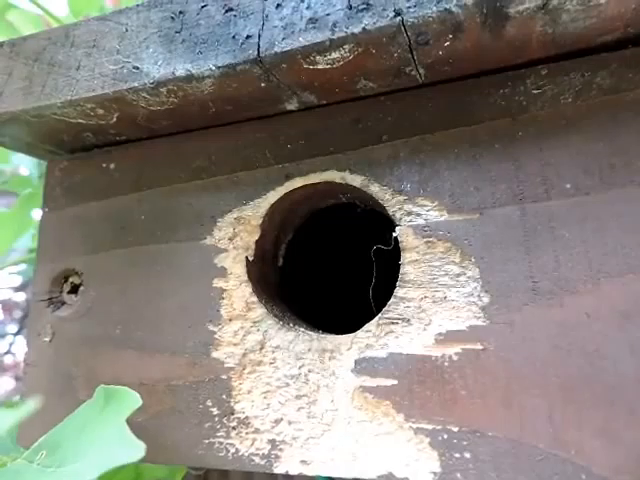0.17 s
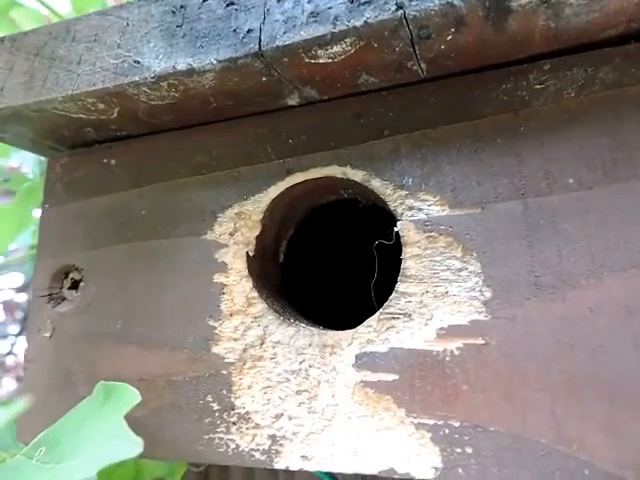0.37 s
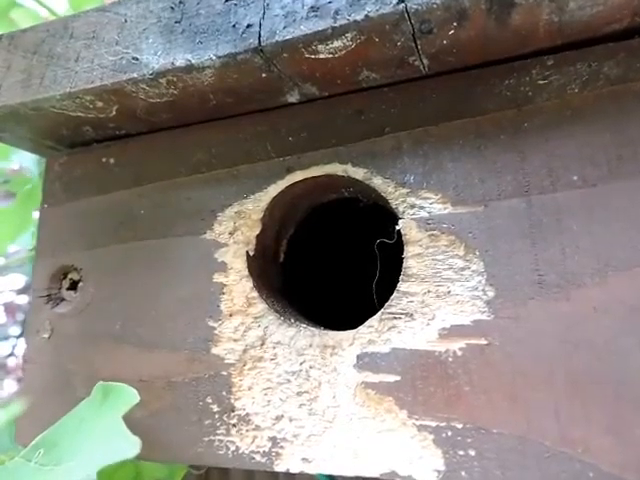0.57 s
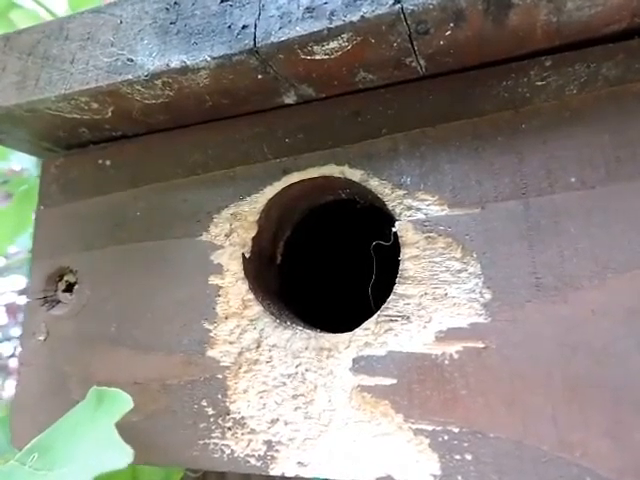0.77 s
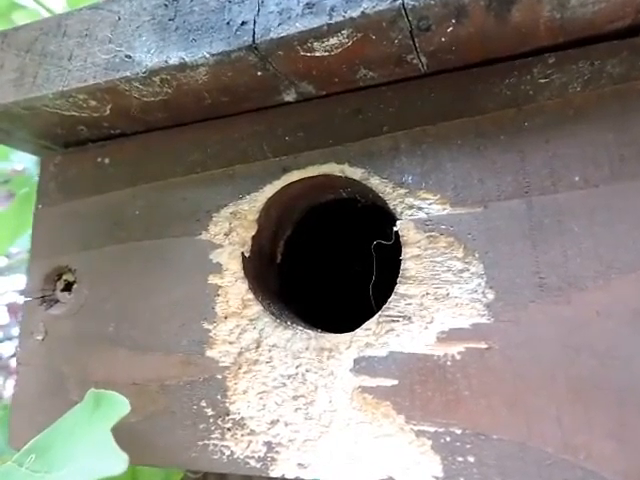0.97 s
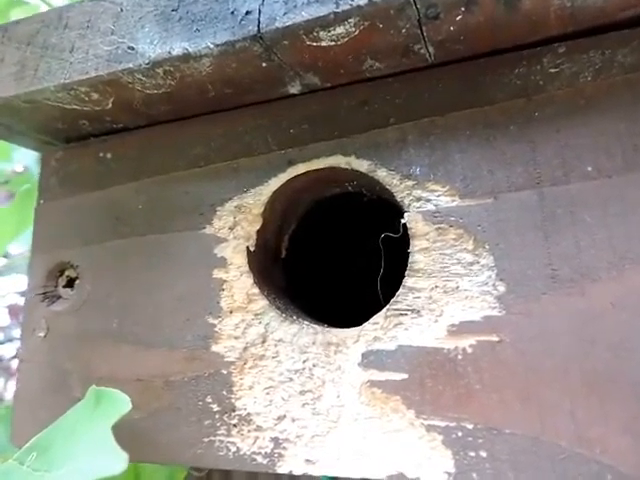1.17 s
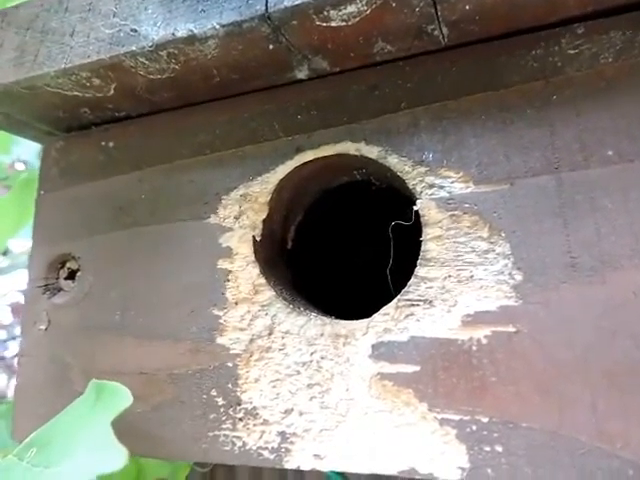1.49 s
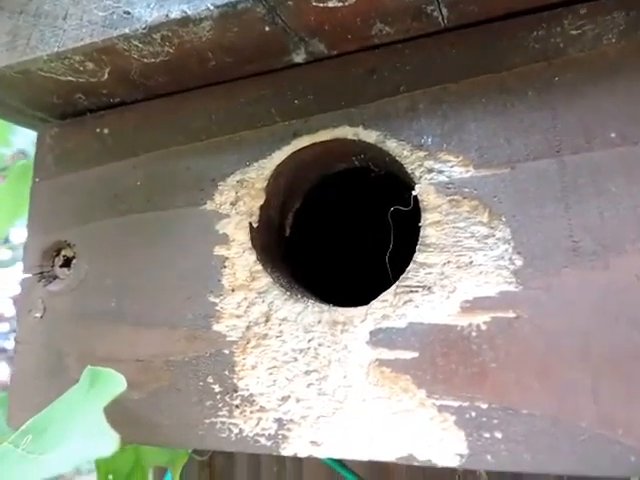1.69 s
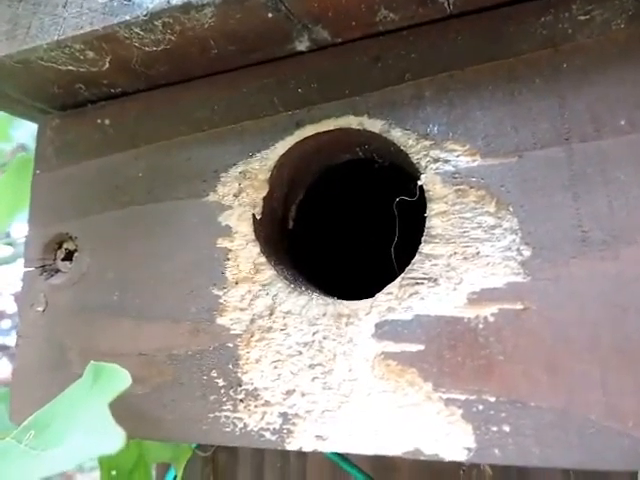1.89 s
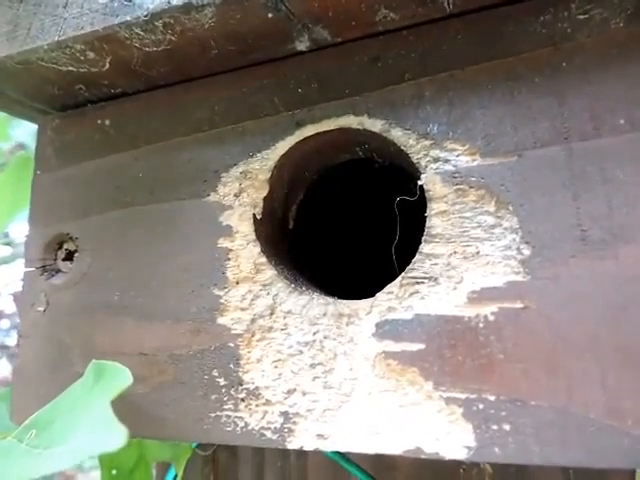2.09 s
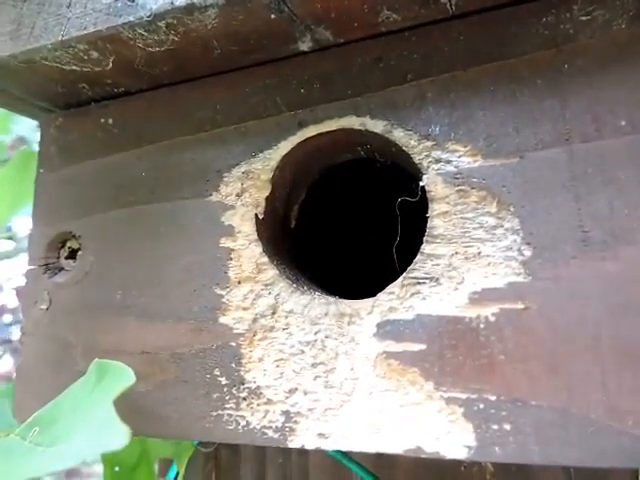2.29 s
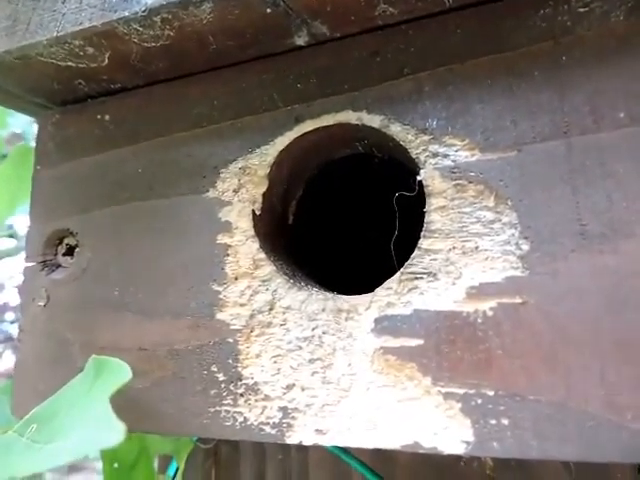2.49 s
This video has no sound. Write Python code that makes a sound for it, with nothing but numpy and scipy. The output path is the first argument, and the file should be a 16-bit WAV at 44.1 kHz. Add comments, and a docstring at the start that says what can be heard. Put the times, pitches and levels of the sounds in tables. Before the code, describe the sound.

Nestlings beg in two quick runs of high, slightly raspy chirps, each starting thin and getting louder, with two soft peeps between them. The microphone is close to their wooden birdhouse, with faint outdoor air behind.

```python
"""Baby birds beg in a wooden nest box: thin rising notes grow into loud chirps, twice, with two soft
peeps in between. Each call is two whistles, one from each side of the bird's voice organ (the syrinx),
which beat against each other and mix into extra tones, with a husky rasp. We listen just outside the
entrance hole, so the box colours the calls and rings briefly, over a faint outdoor rumble."""
import sys
import numpy as np
from scipy import signal
from scipy.fft import rfft, irfft
from scipy.io import wavfile
from scipy.ndimage import uniform_filter1d

SR = 44100
rng = np.random.default_rng(int(sys.argv[2]) if len(sys.argv) > 2 else 0)


def waveform_to_disk(signal):
    """Save audio, clipped to [-1, 1], as 16-bit WAV at the path in sys.argv[1]."""
    frames = np.transpose(np.atleast_2d(signal))
    scaled = np.clip(frames, -1, 1) * 32767
    samples = np.round(scaled).astype(np.int16)
    wavfile.write(sys.argv[1], SR, samples)


N = 116865


def amp(db):
    """Turns decibels into a gain."""
    return 10 ** (np.asarray(db) / 20)


def unit(x):
    """Scales a signal to an average power of 1."""
    return x / np.sqrt(np.mean(abs(x) ** 2) + 1e-20)


def read(points, hz):
    """Looks up a table between its frequencies, on a log scale."""
    f, value = np.transpose(points)
    return np.interp(np.log(hz + 1), np.log(f), value)


def add(mix, start, sound, pan_db):
    """Places a sound in time and between the ears (positive pan is left)."""
    part = mix[:, max(round(start * SR), 0):][:, :len(sound)]
    part += amp([[pan_db / 2], [-pan_db / 2]]) * sound[:part.shape[1]]


def noise(spectrum, n):
    """Noise with the given tone colour."""
    gain = amp(read(spectrum, np.fft.rfftfreq(n, 1 / SR)))
    return unit(irfft(rfft(rng.standard_normal(n)) * gain, n))


def wander(n, rate_hz=614):
    """A smooth random wobble, up to about the given rate."""
    gain = np.exp(-(np.fft.rfftfreq(n, 1 / SR) / rate_hz) ** 2)
    return unit(irfft(rfft(rng.standard_normal(n)) * gain, n))


# tone colour of the outdoor air: (frequency [Hz], relative level [dB])
AIR_COLOUR = [(12, -25), (20, 2), (219, -9.5), (1500, -21.5), (3260, -30.5), (6540, -36.5), (15500, -43.5)]
# its loudness over time: (time [s], level [dB])
AIR_LEVEL = [(.3, -50.5), (.8, -52.5), (1.6, -50.5), (2.6, -50)]
# how alike it is in both ears: (frequency [Hz], likeness [0-1])
AIR_LIKENESS = [(30, 0.26), (170, 1), (1500, 0.095)]


def air():
    """Distant rumble and hiss, partly shared by the two ears."""
    middle, side = rfft(noise(AIR_COLOUR, N)), rfft(noise(AIR_COLOUR, N))
    alike = read(AIR_LIKENESS, np.fft.rfftfreq(N, 1 / SR))
    side *= np.sqrt((1 - alike) / (1 + alike))
    level = amp(np.interp(np.arange(N) / SR, *np.transpose(AIR_LEVEL)))
    return level * irfft([middle + side, middle - side], N)


# low background tones: (pitch [Hz], level [dB])
HUM_TONES = [(208, -62), (370, -68)]


def hum(waver_hz=7):
    """A faint hum that wavers in loudness and pitch."""
    t = np.arange(N) / SR
    tones = 0
    for hz, db in HUM_TONES:
        waver = 1 + .4 * wander(N, waver_hz)
        tones += amp(db) * unit(waver * np.sin(2 * np.pi * hz * t + wander(N, waver_hz)))
    return tones


# puffs of wind: (time [s], width [s], level [dB])
PUFFS = [(1.6, 0.078, -42), (1.93, 0.061, -44.5)]


def wind(rumble_hz=55, pan_db=5):
    """Light wind rumbles on the microphone, more on the left."""
    t = np.arange(N) / SR
    gusts = sum(amp(db) * np.exp(-((t - time) / width) ** 2) for time, width, db in PUFFS)
    shared, left, right = (wander(N, rumble_hz) for _ in range(3))
    return gusts * unit(shared + .5 * np.array([left, right])) * amp([[pan_db / 2], [-pan_db / 2]])


def echoes(fade_s):
    """Spectrum of dense echoes, different at each ear, that fall 60 dB in fade_s."""
    t = np.arange(SR // 5) / SR
    tail = rng.standard_normal((2, len(t))) * 1000 ** (-t / fade_s) * (t > .001)
    return rfft(tail / np.linalg.norm(tail, axis=1, keepdims=True), N)


# pitches the hollow box boosts or weakens: (frequency [Hz], gain [dB])
RESONANCES = [(3200, 3.5), (4480, -0.5), (5030, 3), (6800, 5.5), (7400, 3), (8150, -2), (10650, 2.5)]
# quick scatter off the walls: (frequency [Hz], level [dB])
WALL_SCATTER = [(7000, -16.5), (10000, -1.5)]
# balance of the sound from the hole: (frequency [Hz], left minus right [dB])
BALANCE = [(1800, -0.5), (5000, -2.5), (15000, 0.5)]


def nest_box(calls, width_hz=170, ring_db=-11, gain_db=-1.32, left_lead_rad=-.77):
    """The hollow colours the calls and rings; the direct sound reaches the ears out of step."""
    hz = np.fft.rfftfreq(N, 1 / SR)
    hollow = np.prod([1 + (amp(db) - 1) / (1 + 2j * (hz - f) / width_hz) for f, db in RESONANCES], axis=0)
    ring = amp(ring_db) * echoes(.11) + amp(read(WALL_SCATTER, hz)) * echoes(.023)
    ear = np.array([[.5], [-.5]])  # left, right
    direct = np.exp(1j * left_lead_rad * ear)
    return irfft(rfft(calls) * hollow * (direct + ring) * amp(gain_db + ear * read(BALANCE, hz)), N)


# faint low tones under some chirps: (start [s], first pitch [Hz], level [dB])
UNDERTONES = [(.44, 1153, -54), (.562, 519, -51), (.68, 419, -55), (1.89, 1198, -51.5),
              (2.003, 1200, -52.5)]


def undertone(start, first_hz, db, length_s=.055, fall_to=.62, blur=.158):
    """A blurred low tone that slides down."""
    n = round(length_s * SR)
    hz = first_hz * (np.linspace(1, fall_to, n) + blur * wander(n))
    return start, amp(db) * np.sqrt(2 * np.hanning(n)) * np.sin(2 * np.pi * np.cumsum(hz) / SR), 0


CALL_PAN_DB = -2.5
# tiny pips that lead into a call: (time [s], level [dB])
PIPS = [(0.308, -52), (1.853, -49.5)]


def pip(time, db, hz=3314, width_s=.0034):
    """A few milliseconds of whistle."""
    t = np.arange(-.01, .01, 1 / SR)
    level = amp(db) * np.sqrt(2) * np.exp(-(t / width_s) ** 2)
    return time + t[0], level * np.sin(2 * np.pi * hz * t), CALL_PAN_DB


# the tones in a call, each a sum of: (upper pitch [multiple], lower pitch [multiple])
TONES = [(1, 0), (0, 1), (2, 0), (1, 1), (0, 2), (2, 1), (1, 2), (0, 3), (3, 1), (3, 0), (4, 0)]
# colour of the usual rasp: (frequency [Hz], relative level [dB])
RASP = [(400, -3), (2000, -8), (3300, 1.5), (4600, -0.5), (6900, -7.5), (8400, -4.5), (12600, -10.5),
        (15000, -12.5)]


def syrinx(upper_hz, lower_hz, rough, levels, rasp_db, rasp_colour=RASP, jitter_hz=171.3, anchor_hz=3980):
    """Two shaky whistles mix into extra tones, and a rasp pulses with their beat."""
    n = len(upper_hz)
    upper, lower = (2 * np.pi * np.cumsum(hz + jitter_hz * rough * wander(n)) / SR
                    for hz in (upper_hz, lower_hz))
    # the top overtones glide less, drawn towards multiples of one pitch
    held = upper + .2 * (2 * np.pi * anchor_hz * np.arange(n) / SR - upper)
    voice = 0
    for (j, k), db in zip(TONES, levels):
        high = j + k > 2
        smear = high * .45 * wander(n)
        phase = j * (held if high and k == 0 else upper) + k * lower + smear
        flutter = 1 + rough * wander(n)
        voice += amp(db) * flutter * np.cos(phase + rng.uniform(0, 2 * np.pi))
    voice /= np.sqrt(sum(amp(db) ** 2 for db in levels) * (1 + rough ** 2) / 2)
    rasp = unit(noise(rasp_colour, n) * (1 + .9 * np.cos(upper - lower)))
    return (voice + amp(rasp_db) * rasp) / np.sqrt(1 + amp(rasp_db) ** 2)


RAGGED_RATIO = .89  # lower pitch over upper pitch in a ragged voice


def call_shape(length, rise_db_per_s, fall_db_per_s, fray_s=.00636, ragged_db=-3.5):
    """A clear middle with ragged, fading edges: gives time, progress, raggedness and fade."""
    t = np.arange(-.04, length + .04, 1 / SR)
    before, after = np.maximum(-t, 0), np.maximum(t - length, 0)
    ragged = np.clip((before + after) / fray_s, 0, 1)
    fade_db = ragged_db * ragged - rise_db_per_s * before - fall_db_per_s * after
    return t, np.clip(t / length, 0, 1), ragged, fade_db


def soft_call(row, lower_of, levels, rough, rasp_db, rasp_colour=RASP, bend=1, arch_db=0, tilt_db=0):
    """A quiet glide with husky edges; tilt_db favours the upper whistle as it goes."""
    start, length, first_hz, last_hz, db, swell_db = row
    t, along, ragged, fade_db = call_shape(length, rise_db_per_s=695, fall_db_per_s=1104)
    hz = first_hz + (last_hz - first_hz) * along ** bend
    hz += (3700 - hz) * ragged ** 2  # both edges return to one pitch
    levels = [tone_db + tilt_db * (j - k) * (along - .5) for (j, k), tone_db in zip(TONES, levels)]
    level = amp(db + swell_db * (along - 1) - arch_db * (2 * along - 1) ** 2 + fade_db)
    rough += (1 - rough) * ragged
    voice = syrinx(hz, lower_of(hz), rough, levels, rasp_db + 5 * ragged, rasp_colour)
    return start + t[0], level * voice, CALL_PAN_DB


# hoarse trails: (start [s], length [s], first pitch [Hz], last pitch [Hz], level [dB], swell [dB])
TRAILS = [(0.491, .024, 3480, 3460, -45, -1), (2.183, 0.048, 3480, 3480, -44.5, -1.3)]


def trail(row):
    """A very rough, nearly level note just after a chirp."""
    return soft_call(row, lambda hz: hz * RAGGED_RATIO, CHIRP_TONES, rough=.85, rasp_db=-6)


# a peep's share of the first five TONES: (level [dB])
PEEP_TONES = [4, -11, -12.5, -15, -15]
# soft peeps: (start [s], length [s], first pitch [Hz], last pitch [Hz], level [dB], swell [dB])
PEEPS = [(1.141, 0.0274, 3570, 4210, -43, -3.1), (1.309, 0.038, 3600, 4244, -38.5, -1.7)]


def peep(row, lower_hz=3210):
    """The upper whistle rises while the lower one holds its pitch."""
    return soft_call(row, lambda hz: lower_hz, PEEP_TONES, rough=.26, rasp_db=-11.5, arch_db=5)


# a thin note's share of the first eight TONES: (level [dB])
THIN_TONES = [-16, -23, -26, -4, -6.5, -21, -33, -24]
# colour of its rasp: (frequency [Hz], relative level [dB])
THIN_RASP = [(2400, -8.5), (3300, 0), (4300, -10.5), (5100, -4.5), (6700, 1), (8000, -13), (15000, -18)]
# thin notes: (start [s], length [s], first pitch [Hz], last pitch [Hz], level [dB], swell [dB])
THIN_NOTES = [(0.086, 0.023, 3386, 3657, -42, 1.5), (0.197, 0.033, 3163, 3774, -37.5, 5.5),
              (0.324, .039, 3167, 3646, -39, 3.5), (1.633, 0.024, 3337, 3700, -38.5, 6),
              (1.753, .032, 3183, 3713, -40, 2.5), (1.867, 0.027, 3153, 3560, -42, 1.5)]


def thin_note(row):
    """Both whistles rise together, weaker than the high tones they make."""
    return soft_call(row, lambda hz: hz * .79, THIN_TONES, rough=.25, rasp_db=-6,
                     rasp_colour=THIN_RASP, bend=1.25, tilt_db=3.5)


# a chirp's share of each of the TONES: (level [dB])
CHIRP_TONES = [-5, -8, 1, -4, -11, -19, -19.5, -21.5, -18, -16, -20]
# loud chirps: (start [s], length [s], five evenly spaced pitches [Hz], lower over upper pitch at first
# [ratio], level [dB], arch [dB], roughness [0-1], boost of both whistles [dB], lower voice boost [dB])
CHIRPS = [(0.444, 0.044, 3340, 3476, 3545, 3595, 3646, 0.86, -31.5, 0.5, 0.15, 0.5, 4.5),
          (.552, 0.048, 3260, 3627, 3670, 3715, 3710, 0.83, -29, 8, 0.14, 1.1, 3.5),
          (0.668, 0.058, 3286, 3716, 3760, 3714, 3660, .843, -33, 6, 0.14, 3.1, 1.5),
          (0.84, 0.05, 3510, 3865, 3770, 3694, 3670, 0.9, -34.5, 2, 0.24, 3.8, 2.5),
          (1.893, 0.036, 3256, 3317, 3436, 3510, 3485, 0.86, -32, 2, 0.12, 2.3, 1),
          (2.01, 0.04, 3250, 3464, 3550, 3640, 3675, .843, -32, 0.5, 0.17, 0.5, 5.5),
          (2.132, 0.05, 3273, 3540, 3700, 3700, 3676, .843, -32.5, 7.5, .12, 2.1, 2.5),
          (2.306, 0.056, 3740, 3860, 3750, 3684, 3710, .905, -35, 3, 0.24, 3.5, 2)]


def chirp(row, edge_hz=3480, settled_ratio=.843, join_s=.048):
    """A ragged start, a clear arch in which the lower whistle joins, and a ragged end."""
    start, length, *pitches, ratio, db, arch_db, rough, whistles_db, lower_db = row
    t, along, ragged, fade_db = call_shape(length, rise_db_per_s=1012, fall_db_per_s=944)
    hz = uniform_filter1d(np.interp(along, np.linspace(0, 1, len(pitches)), pitches), size=200)
    hz += (edge_hz - hz) * ragged
    ratio += (settled_ratio - ratio) * along
    ratio += (RAGGED_RATIO - ratio) * ragged
    joining_db = -9 * np.clip(1 - t / join_s, 0, 1)
    levels = [tone_db + whistles_db * (j + k == 1) + lower_db * (j == 0) + joining_db * (k > 0)
              for (j, k), tone_db in zip(TONES, CHIRP_TONES)]
    rasp_db = -12 - whistles_db / 2 + 4 * ragged
    rough += (1 - rough) * ragged
    level = amp(db - arch_db * (2 * along - 1) ** 2 + fade_db)
    return start + t[0], level * syrinx(hz, hz * ratio, rough, levels, rasp_db), CALL_PAN_DB / 2


def scene():
    """All calls sound in the box, with the garden around it."""
    birds = np.zeros((2, N))
    for call, table in (chirp, CHIRPS), (trail, TRAILS), (thin_note, THIN_NOTES), (peep, PEEPS):
        for row in table:
            add(birds, *call(row))
    for call, table in (pip, PIPS), (undertone, UNDERTONES):
        for row in table:
            add(birds, *call(*row))
    return nest_box(birds) + air() + hum() + wind()


def record(dry):
    """Cuts the treble above 15650 Hz."""
    lowpass = signal.firwin(511, 15650, window=("kaiser", 9), fs=SR)
    return signal.oaconvolve(dry, lowpass[None], "same")


dry = scene()
out = record(dry)
waveform_to_disk(out)
```